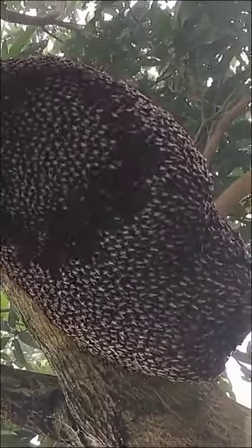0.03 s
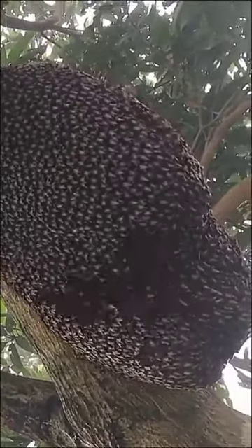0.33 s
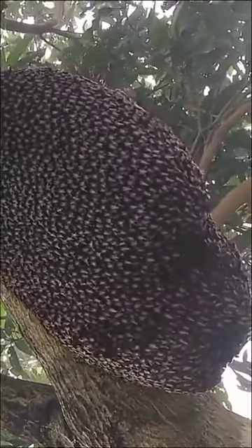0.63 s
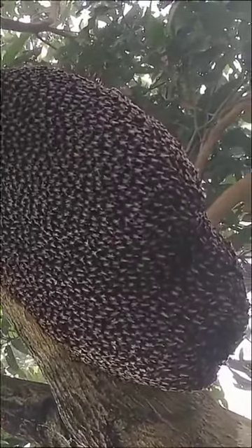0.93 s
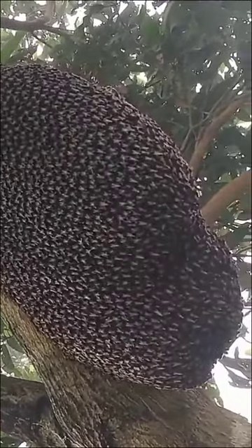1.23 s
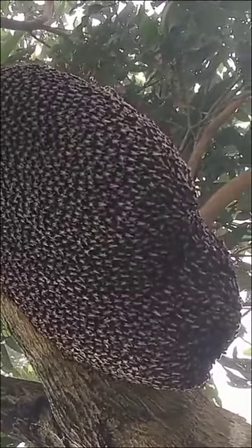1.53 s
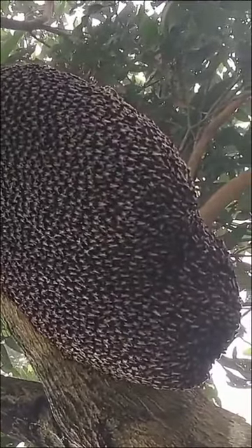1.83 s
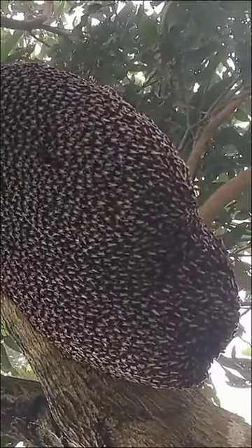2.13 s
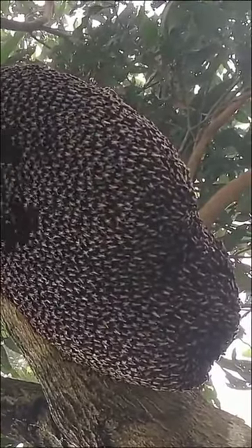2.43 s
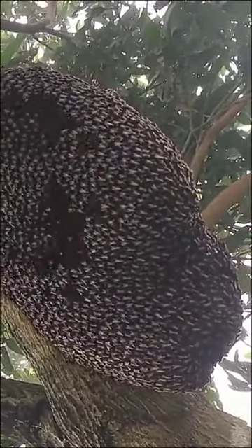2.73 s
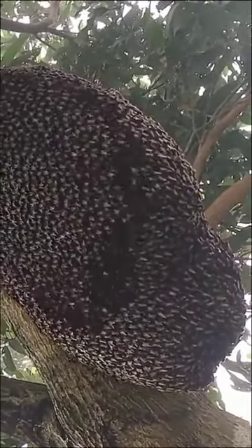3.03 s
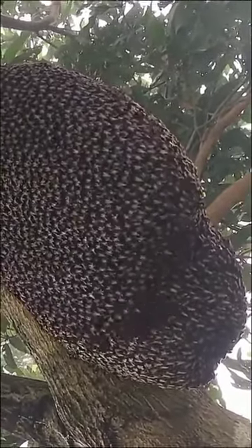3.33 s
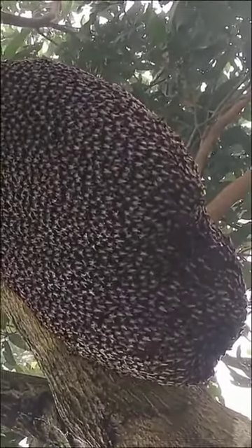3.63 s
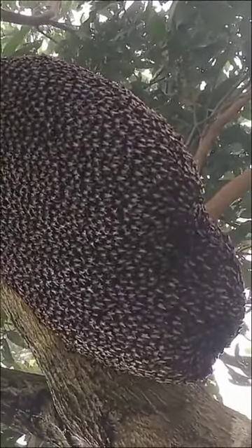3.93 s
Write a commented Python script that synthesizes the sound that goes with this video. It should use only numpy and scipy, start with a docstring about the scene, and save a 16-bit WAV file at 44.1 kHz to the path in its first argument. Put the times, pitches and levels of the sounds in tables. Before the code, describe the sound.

A large bee colony cuts in at about 0.3 seconds, buzzing close by with a dense, raspy sizzle of wings. The buzz merges into a stronger, wavering low hum until 1 second, and again from about 2.1 to 3.3 seconds, then eases slightly through 4 seconds. Single bees whine briefly past. Tiny dry ticks come near 0.5, 1.4, 2.6 and 3.5 seconds, over a faint outdoor rumble.

```python
"""Giant honey bees on a branch

Close by, a colony flicks its wings in short buzzing bursts, each a pulse train of strokes that push air
and snap. Twice a wave of flicks sweeps over it, and the wings beat faster and merge into one hum.
Single bees pass, with a few dry ticks and a faint outdoor rumble. All cuts in after a quarter second."""
import sys
import numpy as np
from scipy import signal
from scipy.fft import rfft, irfft, next_fast_len
from scipy.io import wavfile
from scipy.ndimage import uniform_filter1d, map_coordinates

SR = 44100
rng = np.random.default_rng(int(sys.argv[2]) if len(sys.argv) > 2 else 0)


def generate_wav(signal):
    """Clip the signal to [-1, 1] and save it as 16-bit WAV at the path in sys.argv[1]."""
    frames = np.transpose(np.atleast_2d(signal))
    scaled = np.clip(frames, -1, 1) * 32767
    pcm = np.round(scaled).astype(np.int16)
    wavfile.write(sys.argv[1], SR, pcm)


N = 176400
TIME = np.arange(N) / SR
STROKE_SCATTER_DB = 2.2


def colony():
    """Incoherent sources add in power: strokes drone, snaps rasp, and the microphone tints their sizzle."""
    # Each row: time in seconds, alarmed bees' share of the snap power.
    alarm = [(.3, 0.54), (.85, 0.86), (1.3, 0.48), (1.55, 0.76), (1.9, 0.7), (2.9, 0.96), (3.2, 0.55),
             (3.6, 0.37), (4.0, 0.5)]
    # Each row: time in seconds, relative levels of drone, rasp and sizzle in dB.
    effort = [(.29, -39.5, -39, -41), (.42, -44, -42.5, -44), (.55, -46.5, -39, -43), (.9, -43, -39, -43),
              (1.25, -39, -39.5, -42), (1.55, -41, -38.5, -43.5), (1.85, -40.5, -39, -42),
              (2.2, -41, -37, -43.5), (2.45, -47.5, -37, -44), (2.72, -43.5, -38.5, -45.5),
              (2.95, -41, -38, -42.5), (3.15, -46, -40, -44), (3.43, -43.5, -42, -47), (3.6, -43, -42, -45),
              (3.76, -44, -39.5, -44.5), (4.0, -43.5, -42, -48.5)]
    # Two spectra. Each row: frequency in Hz, gain in dB.
    drone_spectrum = [(90, -45.5), (130, -8), (165, 0.5), (220, 2.5), (300, -7), (380, -4.5), (500, -5.5),
                      (590, -15.5), (900, -35.5), (1500, -42)]
    rasp_spectrum = [(350, -26.5), (600, -9), (700, -3), (850, -5.5), (1300, -3.5), (1600, -1.5),
                     (1850, 1.5), (2200, -1), (2800, -6.5), (3400, -5), (4000, -10), (4480, -7.5),
                     (5000, -12.5), (8000, -42.5)]
    # High sizzle of wing snaps, with the microphone's fixed treble resonances.
    # Each row: frequency in Hz, gain in dB.
    sizzle_through_mic_spectrum = [(3000, -31.5), (5000, -12), (5750, -2), (6400, 3.5), (7000, -0.5),
                                   (7550, 1.5), (8100, 0.5), (8400, -5.5), (8950, 2), (9600, -5.5),
                                   (10200, -1), (10850, -8), (11450, -5), (12200, -12.5), (13400, -12),
                                   (14200, -25), (15800, -56)]
    calm, calm_snaps = flicks(beat_hz=177.83, spread=.11, length_s=.11, count=140)
    alarmed, alarmed_snaps = flicks(beat_hz=233.1, spread=.06, length_s=.092, count=180)
    share = curves(alarm)[0].clip(0, 1)
    snaps = np.sqrt(1 - share) * calm_snaps + np.sqrt(share) * alarmed_snaps
    envelope = np.sqrt(np.abs(uniform_filter1d(snaps ** 2, size=60)))
    snaps += amp(-10) * envelope * rng.standard_normal(N)  # air noise
    drone = steady(coloured(calm, drone_spectrum), span_s=.18)
    drone += np.sqrt(share) * steady(coloured(alarmed, drone_spectrum), span_s=.17)
    rasp = steady(coloured(snaps, rasp_spectrum), span_s=.081)
    sizzle = steady(coloured(snaps, sizzle_through_mic_spectrum), span_s=.098)
    drone_db, rasp_db, sizzle_db = curves(effort)
    return amp(drone_db + 1.5) * drone + amp(rasp_db + .55) * rasp + amp(sizzle_db + .28) * sizzle


def flicks(beat_hz, spread, length_s, count):
    """Impulse excitation: bursts of strokes swell, arch in pitch and die; each rings a damped snap."""
    size, beats = 14000, 64  # samples and wingbeats allotted to a burst
    sag, glide, jitter_s, ring_s = .051, .04484, .00001, .00057
    ring = np.exp(-np.arange(128) / SR / ring_s)
    strokes, snaps = np.zeros((2, N + size))
    for i in range(count):
        start = int((i + rng.random()) / count * N)
        pitch, length, loud, slope, lag = rng.standard_normal(5).clip(-2, 2)
        jitter, scatter = rng.standard_normal((2, beats))
        snap = ring * rng.standard_normal(len(ring))  # each bee's own colour
        snap /= np.linalg.norm(snap)
        hz = beat_hz * np.exp(spread * pitch)
        half_s = length_s / 2 * np.exp(.299 * length)
        u = ((np.arange(beats) - beats / 2) / hz / half_s).clip(-1, 1)  # progress through the burst
        bent = u + sag * (u ** 3 - u / 2) / 2 + glide * slope * u ** 2 / 2
        times = size / 2 / SR + half_s * bent + jitter_s * jitter
        heights = (1 - u ** 2) * amp(3 * loud + STROKE_SCATTER_DB * scatter)
        down = pulses(times, heights, size)
        back = pulses(times + (.5 + .0802 * lag) / hz, heights, size)
        clicks = down + amp(-9) * back  # the return stroke pushes air but hardly snaps
        strokes[start:start + size] += down + amp(-5) * back
        snaps[start:start + size] += .48 * clicks + np.convolve(clicks, snap)[:size]
    return unit(strokes[size // 2:][:N]), unit(snaps[size // 2:][:N])


def wave_hum():
    """Synchrony: wings in step sum to three harmonics; stragglers beat against them and roughen the hum."""
    # One list a wave. Each row: time in seconds, wingbeat in Hz, relative fundamental and octave in dB.
    waves = [
        [(.28, 220, -34, -33.5), (.35, 216.1, -33.5, -37.5), (.4, 219.9, -32, -37), (.435, 232.5, -59, -54),
         (.475, 234.4, -30.5, -33), (.55, 236.2, -34, -50), (.61, 224.7, -36.5, -32.5), (.7, 237.3, -35, -40),
         (.81, 229.9, -30.5, -32.5), (.92, 225, -34, -36.5), (1.02, 216, -38, -37.5)],
        [(2.08, 249.1, -37, -37), (2.15, 233, -41, -31), (2.24, 257.8, -38, -45.5), (2.35, 238.2, -33.5, -36.5),
         (2.385, 242.7, -54, -51), (2.41, 232.4, -34, -36), (2.54, 238, -36.5, -35), (2.59, 227.2, -34.5, -32),
         (2.68, 236.5, -36, -37.5), (2.78, 230, -31.5, -34.5), (2.812, 220, -30, -36), (2.835, 228.6, -38, -39),
         (2.97, 236, -35.5, -37), (3.06, 235.3, -42.5, -43), (3.2, 232.7, -44, -45.5), (3.33, 238.6, -44, -43)],
    ]
    wander, fade_s, straggler_hz = .01177, .027, 65
    out = np.zeros(N)
    for rows in waves:
        hz, first_db, octave_db = curves(rows)
        phase = 2 * np.pi * np.cumsum(hz * (1 + wander * wobble(40))) / SR
        inside_s = np.minimum(TIME - rows[0][0], rows[-1][0] - TIME)
        fade = np.clip(1 + inside_s / fade_s, 0, 1)
        for k, db in enumerate([first_db - 1.6, octave_db - 1.4, first_db - 23], 1):
            stragglers = .13 * (wobble(straggler_hz) + 1j * wobble(straggler_hz))
            harmonic = np.real((1 + stragglers) * np.exp(1j * k * phase))
            out -= np.sqrt(2) * fade * amp(db) * harmonic
    return out


def near_bees():
    """Source and filter: each bee's wavering pulse train has a nasal formant, higher for faster wings."""
    # Each row: start and length in seconds, first, middle and last wingbeat in Hz, level in dB.
    passes = [(0.292, 0.1, 267, 252, 245, -44), (0.377, .28, 228, 228, 226.8, -38.5),
              (.64, .17, 235.3, 242, 234, -43.5), (0.902, 0.083, 220.5, 214.8, 212.7, -41.5),
              (1.061, 0.17, 232.7, 239.8, 243, -44), (1.219, 0.15, 252, 256.4, 237, -43.5),
              (1.631, 0.14, 203, 207.5, 216, -45), (1.732, 0.2, 248, 241.2, 231.4, -42),
              (1.771, 0.16, 278, 260.4, 234, -39), (2.015, 0.098, 207, 204.8, 192, -40.5),
              (2.151, 0.097, 264, 251.6, 247, -37), (2.2, .11, 220, 228.4, 234, -42),
              (2.386, 0.066, 218.3, 233.4, 242, -42), (2.478, 0.094, 238, 233.9, 218, -42.5),
              (2.766, 0.1, 224.7, 235.3, 234.3, -48), (2.94, .13, 233.4, 222.8, 234, -39.5),
              (3.257, 0.14, 226, 229, 239, -43)]
    # Each row: frequency in Hz for a bee at reference_hz, gain in dB.
    whine = [(130, -27), (230, -3), (460, -1.5), (620, -8), (1150, -13.5), (1400, -25), (1620, -9),
             (1840, 3.5), (2080, -11.5), (2700, -15), (3400, -19), (5000, -18.5), (7500, -18), (10500, -31),
             (15000, -44)]
    reference_hz, wander, jitter_s = 236.5, .00408, .000012
    out = np.zeros(N)
    for start, length, first_hz, middle_hz, last_hz, db in passes:
        u = np.clip(2 * (TIME - start) / length - 1, -1, 1)
        hz = middle_hz + (last_hz - first_hz) / 2 * u + ((first_hz + last_hz) / 2 - middle_hz) * u ** 2
        beats = np.cumsum(hz * (1 + wander * wobble(35))) / SR
        times = np.interp(np.arange(1200), beats, TIME, right=-1)  # one stroke per whole beat
        jitter, scatter = rng.standard_normal((2, len(times)))
        strokes = pulses(times + jitter_s * jitter, amp(STROKE_SCATTER_DB * scatter))
        spectrum = np.array(whine) * [middle_hz / reference_hz, 1]
        out += amp(db) * (1 - u ** 4) * unit(coloured(strokes, spectrum, ripple_db=4.0))
    return out


def ticks():
    """A brief transient has a broad spectrum: fast-decaying noise makes tiny bright clicks."""
    # Each row: start in seconds, peak in dB.
    events = [(0.48, -28), (0.493, -21), (1.4385, -31), (2.552, -25), (3.5078, -23), (3.5208, -22)]
    # Each row: frequency in Hz, gain in dB.
    spectrum = [(1000, -28), (6000, -26), (7600, 4), (9500, 5), (12500, 2), (14000, -8), (16000, -19)]
    decay_s = .0002
    out = np.zeros(N)
    for start, db in events:
        envelope = (TIME >= start) * np.exp(-np.abs(TIME - start) / decay_s)
        click = coloured(rng.standard_normal(N) * envelope, spectrum)
        out += amp(db) * click / np.abs(click).max()
    return out


def rumble():
    """Filtered noise, strongest at low frequencies, forms the outdoor background."""
    # Each row: time in seconds, level in dB.
    levels = [(.3, -39.5), (1.7, -40.5), (3.3, -40.5), (3.9, -44.5)]
    # Each row: frequency in Hz, gain in dB.
    spectrum = [(15, -9), (38, -0.5), (50, -7), (72, -1.5), (110, -7.5), (200, 0.5), (600, -13),
                (3000, -27), (15000, -38)]
    return amp(curves(levels)[0]) * unit(coloured(rng.standard_normal(N), spectrum))


def amp(db):
    """Decibels as an amplitude ratio."""
    return 10 ** (np.asarray(db) / 20)


def unit(x):
    """Normalisation to rms 1."""
    return x / np.sqrt(np.mean(x ** 2) + 1e-20)


def steady(x, span_s):
    """Normalisation to a running rms of 1."""
    span = int(span_s * SR)
    power = np.abs(uniform_filter1d(uniform_filter1d(x ** 2, span), span))
    return x / np.sqrt(power + 1e-20)


def curves(rows):
    """Linear interpolation of each column after the time, at every sample."""
    times, *columns = np.transpose(rows)
    return [np.interp(TIME, times, column) for column in columns]


def wobble(rate):
    """Smooth random modulation, with rate knots a second."""
    return map_coordinates(rng.standard_normal(1024), [TIME * rate], mode="wrap")


def coloured(x, points, ripple_db=0):
    """Minimum-phase filter through (Hz, dB) points, with optional random ripple."""
    size = 8192
    hz = np.fft.rfftfreq(size, 1 / SR)
    point_hz, point_db = np.transpose(points)
    ripple = map_coordinates(rng.standard_normal(64), [np.sqrt(hz / hz[-1]) * 63])
    db = np.interp(np.log(hz + 1), np.log(point_hz), point_db) + ripple_db * ripple
    cepstrum = irfft(np.log(amp(db)))
    cepstrum[1:size // 2] *= 2  # folding makes the response causal
    cepstrum[size // 2 + 1:] = 0
    return signal.fftconvolve(x, irfft(np.exp(rfft(cepstrum))))[:N]


def pulses(times, heights, size=N):
    """Band-limited impulses: windowed sincs placed between samples."""
    keep = (times > 0) & (times < size / SR) & (heights > 0)
    at = times[keep][:, None] * SR
    taps = np.floor(at).astype(int) + np.arange(-7, 9)
    shape = np.sinc(taps - at) * np.cos(np.pi * (taps - at) / 16) ** 2
    return np.bincount(np.abs(taps).ravel(), (heights[keep][:, None] * shape).ravel(), size)[:size]


def scene():
    """Superposition of all sources in one channel."""
    return (colony() + near_bees() + wave_hum() + ticks() + rumble())[None]


def record(dry):
    """Gating and band limiting: the muted input opens abruptly and passes nothing above top_hz."""
    # Each row: time in seconds, gain in dB.
    opening = [(0, -37), (.12, -47), (.18, -67), (.262, -81), (.276, 0)]
    top_hz = 15800
    gated = dry * amp(curves(opening)[0])
    size = next_fast_len(N + SR // 2)
    passband = np.fft.rfftfreq(size, 1 / SR) < top_hz
    return irfft(rfft(gated, size) * passband, size)[:, :N]


dry = scene()
out = record(dry)
generate_wav(out)
```